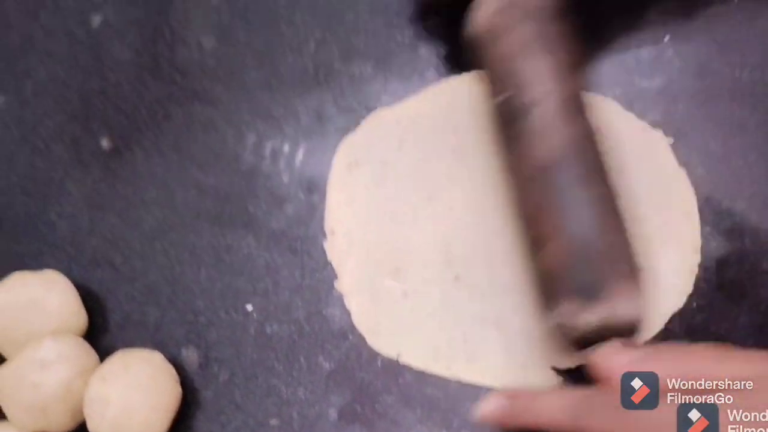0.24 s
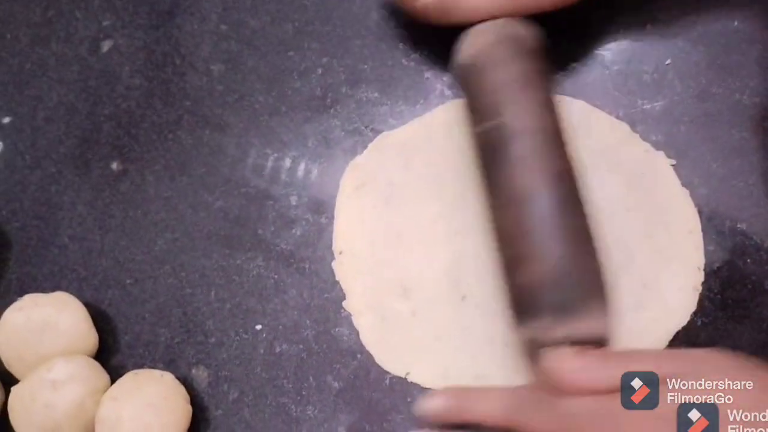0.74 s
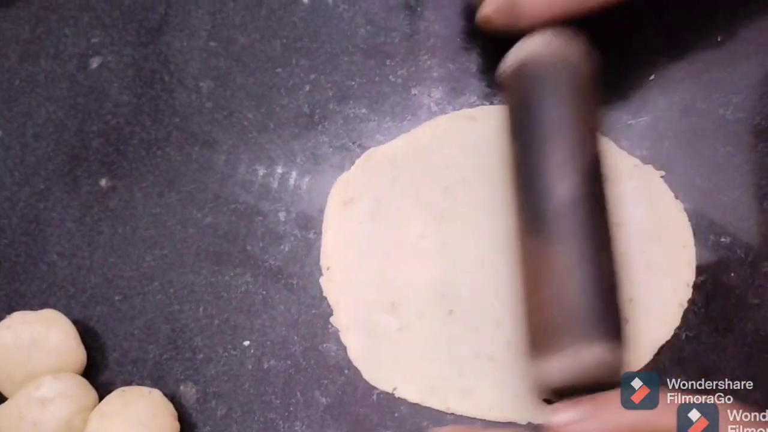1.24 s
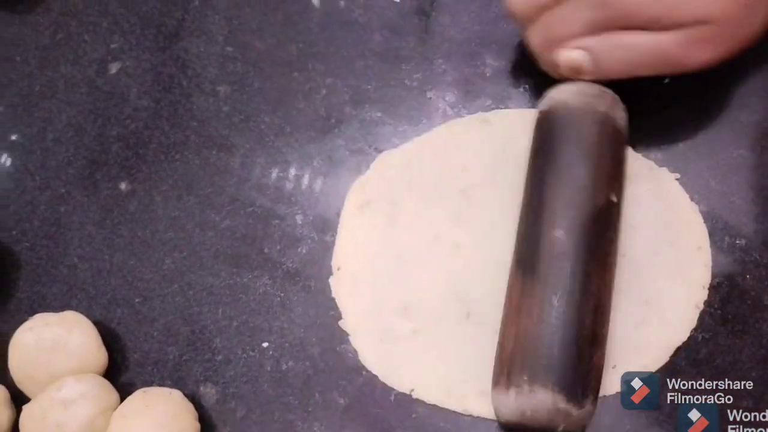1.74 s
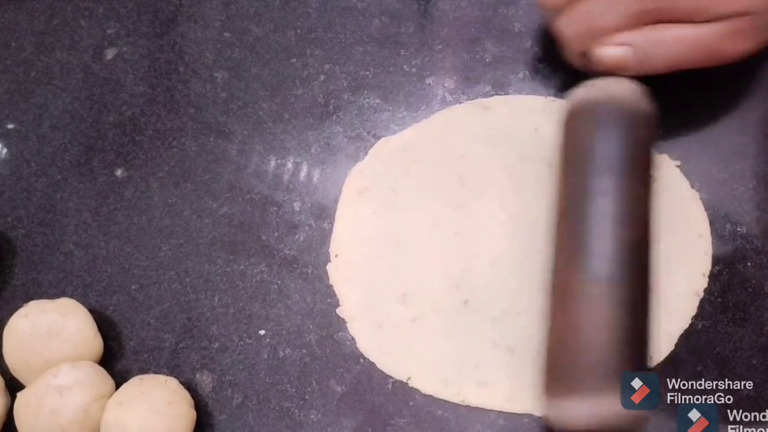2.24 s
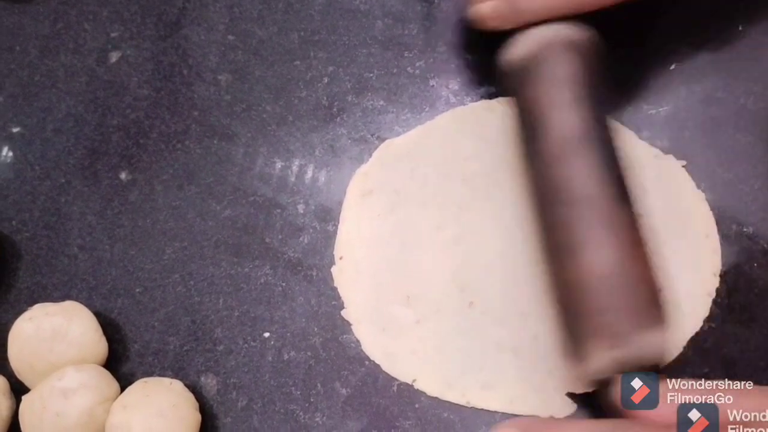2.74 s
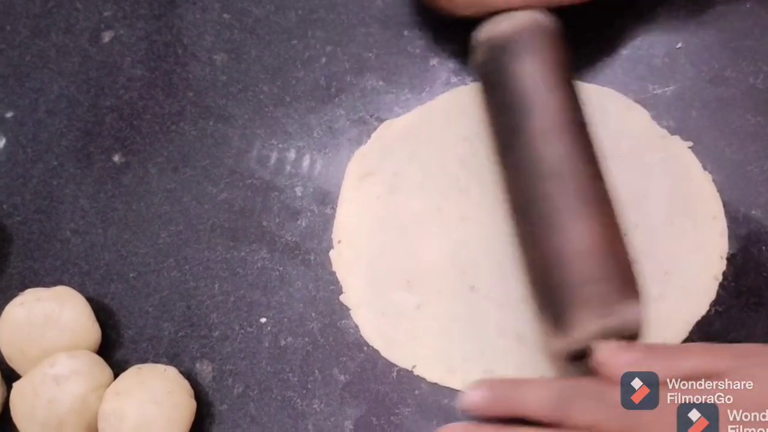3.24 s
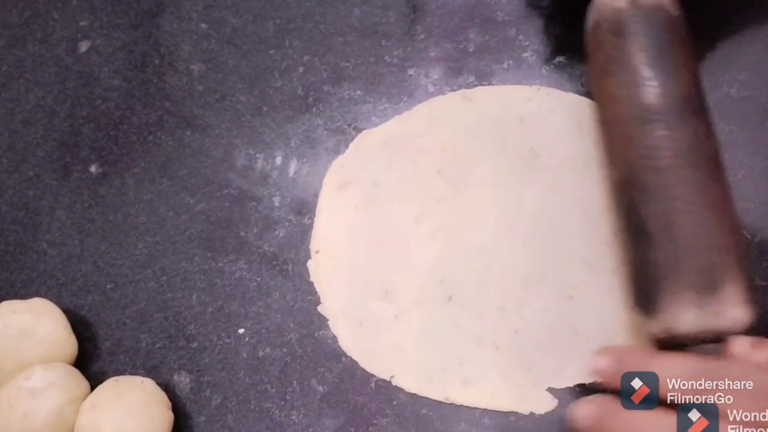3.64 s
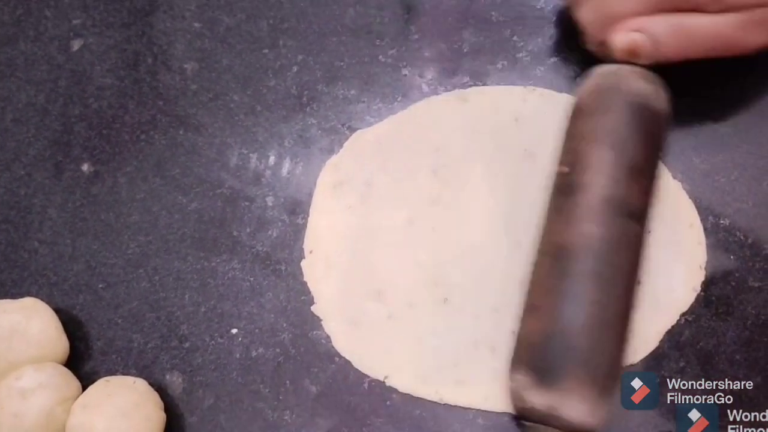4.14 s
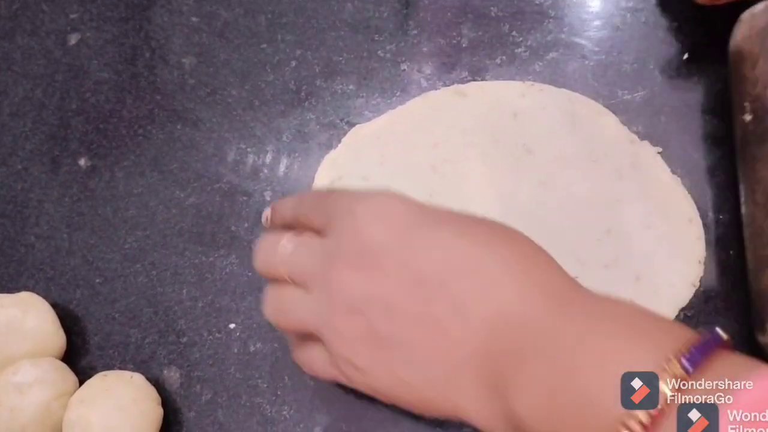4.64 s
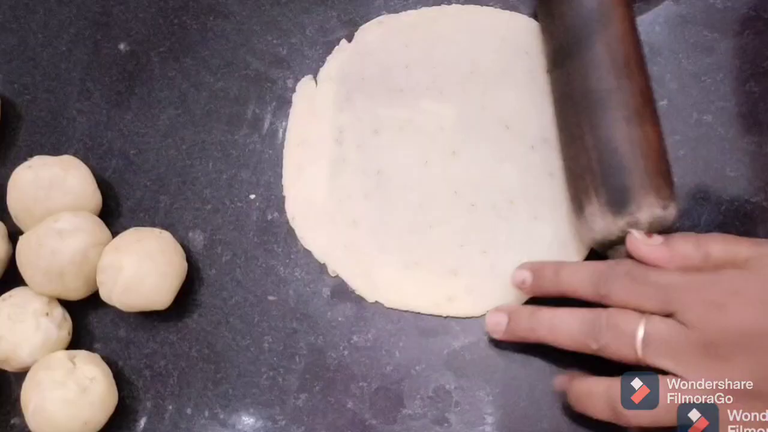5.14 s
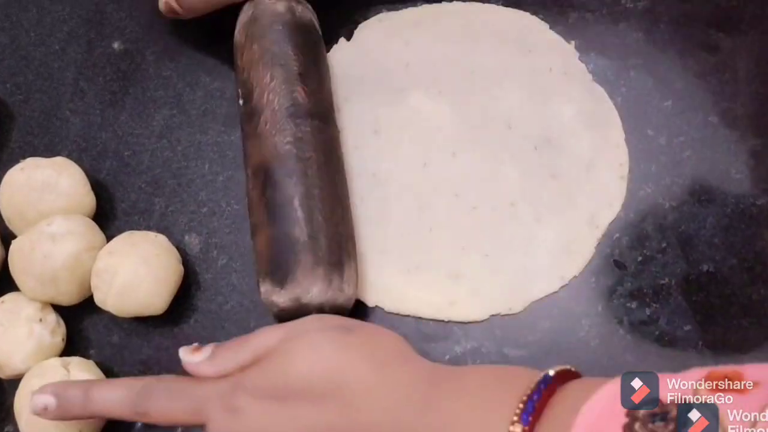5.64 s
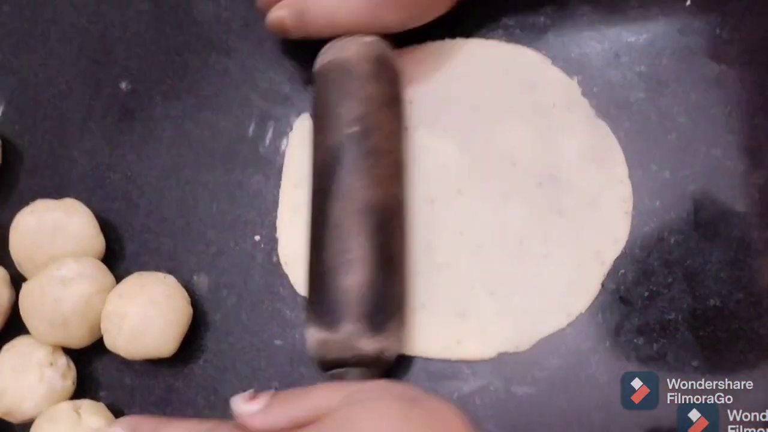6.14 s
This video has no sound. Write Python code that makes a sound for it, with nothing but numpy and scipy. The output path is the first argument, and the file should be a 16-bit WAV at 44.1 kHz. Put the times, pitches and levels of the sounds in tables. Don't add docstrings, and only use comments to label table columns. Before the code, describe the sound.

A wooden rolling pin knocks sharply on a stone counter at uneven intervals, with faint glass bangle ticks over a low wavering motor hum.

```python
import sys
import numpy as np
from scipy import signal
from scipy.io import wavfile
from scipy.ndimage import uniform_filter1d

SR = 44100
rng = np.random.default_rng(int(sys.argv[2]) if len(sys.argv) > 2 else 0)


def to_linear_factor(level_db):
    exponent = np.asarray(level_db, float) / 20
    return 10 ** exponent


def inscribe(sig):
    pcm = np.round(np.clip(np.atleast_2d(sig).T, -1, 1) * 32767)
    wavfile.write(sys.argv[1], SR, pcm.astype(np.int16))


N = 281358

# (frequency [Hz], density [dB per Hz])
AIR = [(15, -71.5), (25, -47.5), (53, -49.5), (80, -16.5), (114, -26.5), (146, -5.5), (171, -22.5),
       (196, -8.5), (287, -10), (494, -16.5), (742, -15.5), (1540, -21.5), (5520, -40), (14700, -43.5),
       (16300, -77)]
# (frequency [Hz], correlation [-1..1])
PORT_LIKENESS = [(60, 0.95), (150, 0.92), (380, 0.89), (950, 0.16), (2380, -0.039), (5980, -0.11),
                 (15000, 0.16)]
# (frequency [Hz], left minus right [dB])
PORT_BALANCE = [(60, -2.5), (130, -5), (290, 3), (640, -2.5), (1410, 0), (3100, -3), (6820, -10),
                (15000, 1)]
# (time [s], level [dB])
HUM_SWELLS = [(0, -51.5), (.7, -48), (1.15, -47.5), (1.3, -61), (1.62, -41), (2.0, -48), (2.158, -45.5),
              (2.64, -50.5), (3.1, -46.5), (3.8, -53.5), (4.1, -50.5), (4.32, -43), (4.801, -49),
              (4.96, -63), (5.1, -54), (5.85, -49.5), (6.0, -69), (6.38, -44.5)]
# (frequency [Hz], width [Hz], level [dB])
DRONE = (87, 9, -55)
# (time [s], peak [dB], crack centre [Hz], ring [dB], burst [ms])
TICKS = [(0.058, -45.5, 7100, -27, 2.1), (.18, -52, 8800, -28, 1.9), (.621, -42.5, 6700, -22, 4),
         (0.994, -50, 6800, -27.5, 2.9), (1.0375, -28, 7600, -19.5, 1.8), (2.573, -40.5, 7100, -26.5, 2.3),
         (2.671, -57, 7500, -27, 4), (3.08, -47, 6660, -28, 2.8), (3.1026, -30.5, 8600, -23, 2.2),
         (3.508, -48, 7500, -15.5, 2.5), (3.570, -40, 8100, -33, 3.2), (4.2023, -49, 7000, -26.5, 2.5)]
# (frequency [Hz], width [Hz], level [dB], t60 [s])
GLASS_MODES = [(7580, 420, -6.5, 0.5), (7100, 1700, -11.5, 0.41), (8500, 1500, -3.5, 0.12),
               (14000, 2000, -9.5, .15)]
# (frequency [Hz], t60 [s])
ROOM_DECAY = [(70, 0.4), (180, 0.69), (490, 0.54), (1290, 0.66), (2500, 0.97), (4000, 0.29), (8000, .45),
              (15000, 0.17)]
# (frequency [Hz], level [dB])
WALL_COLOUR = [(60, -4), (120, 6), (200, -4), (300, -1), (500, 6), (800, 9), (1200, 3.5), (1700, 1.5),
               (3000, 0), (6000, -3), (15000, -2.5)]
# (frequency [Hz], t60 [s], level [dB])
STANDING_WAVES = [(87.1, 0.94, -21), (110.4, 1.2, -26.5), (139.1, 0.72, -20.5), (168.5, 0.39, -28),
                  (214.8, 0.74, -22.5), (253, 0.61, -28.5), (312.7, 0.58, -22.5), (393, .5, -20),
                  (807, .6, -31.5)]
# (time [s], peak [dB], contact [ms], rebound delay [ms], rebound [dB])
KNOCKS = [(0.3831, -15.5, 0.56, 4.0, -6), (.410, -27, 0.58, 2.5, 3.5), (0.466, -30, 0.48, 4.1, 14),
          (1.3603, -2.6, 0.036, 3.5, -25), (2.8933, -8, 0.19, 3.0, -9.5), (3.8636, -4, 0.067, 2.5, -17),
          (4.69, -33, 0.33, 2.2, -3), (4.7180, -18.5, 0.087, 2.85, -4), (4.7653, -21, 0.081, 2.8, -4),
          (4.7927, -28, 0.063, 2.36, 5), (4.819, -28, 0.28, 2.06, -2), (5.115, -41, 0.19, 3.2, -6),
          (5.221, -35.5, 1.54, 8.4, 2)]
# (frequency [Hz], left [dB], right [dB])
PIN_MODES = [(254.3, -2, -3.5), (532, -3, -7), (812, -3, -4), (1150, -5, -1.5), (1475, -7.5, -6),
             (1748, -17, -16.5), (2030, -26, -11.5), (2300, -25, -13), (2900, -31, -18.5)]
# (frequency [Hz], gain [dB])
MIC = [(20, 1), (4200, 1), (5700, -4), (7500, 0), (9500, -2.5), (14500, -5), (15450, 4.5), (15900, -21.5),
       (22050, -48.5)]

AIR_DB, AIR_TREBLE_DB, AFTER_CUT_DB, RUSH_DB, RUSH_S = -43, -7, 0.77, 2, 0.071
CUT_S, BACK_S, FADE_S = 5.2695, 5.611, 0.055
HUM_HZ, WAVER_HZ = 144.6, 0.64
USUAL_TICK_DB, TOP_DB, TOP_PER_DB, LEFT_DB, LEFT_PER_DB = -42, -24, 0.8, -28, -2.3
BOUNCE_MS, BOUNCE_DB = 4.6, -5.5
CRACK_DB, CRACK_PER_DB, DOUGH_CRACK_DB_PER_MS, KNOCK_ROOM_DB = -40, 1.9, 15, -8.5
RISE_MS, LAG_MS = 0.9, 0.2
RING_S, GRIP_MS, SWELL, SWELL_MS = 0.09, 6.6, 0.6, 1.4
LIGHT_DB, LIGHT_GRIP = -17.5, 0.5


def read(points, hz):
    f, value = np.transpose(points)
    return np.interp(np.log(hz + 1), np.log(f + 1), value)


def evened(x):
    return x / np.sqrt(np.mean(x ** 2) + 1e-20)


def add(mix, s, sound):
    part = mix[..., round(s * SR):][..., :sound.shape[-1]]
    part += sound[..., :part.shape[-1]]


def band(x, order, hz, kind):
    return signal.sosfilt(signal.butter(order, hz, kind, fs=SR, output="sos"), x)


def resonate(x, hz, width):
    turn = np.exp(2j * np.pi * hz * np.arange(len(x)) / SR)
    r = np.exp(-np.pi * width / SR)
    return 2 * (turn * signal.lfilter([1 - r], [1, -r], x / turn)).real


def diffuse(frames, db, size):
    hz = np.fft.rfftfreq(size, 1 / SR)[:, None]
    t = np.arange(frames) * size / 4 / SR
    a, b, c, d = rng.standard_normal((frames, len(hz), 4)).T
    same = np.clip(read(PORT_LIKENESS, hz), -1, 1)
    left = a + 1j * b
    right = same * left + np.sqrt(1 - same ** 2) * (c + 1j * d)
    lean = to_linear_factor(read(PORT_BALANCE, hz) / 2)
    spectrum = np.array([left * lean, right / lean]) * to_linear_factor(db(hz, t))
    return signal.istft(spectrum, nperseg=size, noverlap=size * 3 // 4)[1]


def air():
    frames = N // 512 + 5
    patches = rng.standard_normal((frames, 1025)).T
    patches = uniform_filter1d(patches, 20, axis=0)
    patches = evened(uniform_filter1d(patches, 6, axis=1))

    def rush(t):
        return (t > CUT_S) * RUSH_DB * np.exp(-np.maximum(t - BACK_S, 0) / RUSH_S)

    def level(hz, t):
        treble = np.clip(np.log2(hz / 2500 + 1e-9), 0, 1)
        return read(AIR, hz) + 0.74 * patches + treble * (AIR_TREBLE_DB - rush(t))

    noise = diffuse(frames, level, size=2048)
    t = np.arange(N) / SR
    return to_linear_factor(AIR_DB + (t > CUT_S) * AFTER_CUT_DB + rush(t)) * evened(noise[:, :N])


def hum():
    s, db = np.transpose(HUM_SWELLS)
    t = np.arange(N) / SR
    rates = np.geomspace(0.3, 5, num=12)
    drift = evened(sum(np.sin(2 * np.pi * (f * t + rng.random())) / np.sqrt(f) for f in rates))
    phase = 2 * np.pi * np.cumsum(HUM_HZ + WAVER_HZ * drift) / SR
    tone = np.sqrt(2) * to_linear_factor(np.interp(t, s, db)) * np.sin(phase)
    drone_hz, width_hz, drone_db = DRONE
    drone = to_linear_factor(drone_db) * evened(resonate(rng.standard_normal(N), drone_hz, width_hz))
    return (tone + drone) * to_linear_factor([[-0.6], [0.6]])


def tick(peak_db, crack_hz, top_db, ring_db, burst_ms):
    t = np.arange(12000) / SR
    noise = rng.standard_normal((2, len(t)))
    after = t - np.array([[0], [BOUNCE_MS / 1000]])
    touches = to_linear_factor([[0], [BOUNCE_DB]]) * (after >= 0) * np.exp(-abs(after) / (burst_ms / 1000 + 1e-4))
    grit = noise[0] * touches.sum(0)
    wide = band(grit, 3, [4200, 10500], "band")
    top = band(grit, 3, 10000, "high")
    crack = wide + to_linear_factor(top_db + 8.5) * top + 0.83 * resonate(grit, crack_hz, 900)
    ring = 0
    for hz, width, db, t60 in GLASS_MODES:
        cluster = resonate(resonate(noise[1], hz, width), hz, width)
        ring = ring + to_linear_factor(db - 60 * t / t60) * evened(cluster)
    ring = ring * (1 - np.exp(-t / 0.0031))
    return to_linear_factor(peak_db) * (crack / abs(crack).max() + to_linear_factor(ring_db) * ring)


def kitchen(x):
    tail = diffuse(300, lambda hz, t: read(WALL_COLOUR, hz) - 60 * t / read(ROOM_DECAY, hz), size=512)
    t = np.arange(tail.shape[1]) / SR
    tail = tail / np.linalg.norm(tail[0]) * np.clip((t - 0.006) / 0.0011, 0, 1)
    for hz, t60, db in STANDING_WAVES:
        build = np.clip(t / 0.011, 0, 1)
        tail = tail + to_linear_factor(db - 26 - 60 * t / t60) * np.sin(2 * np.pi * hz * t) * build
    return signal.fftconvolve(x[None], tail, axes=1)[:, :N]


def knock(peak_db, crack_db, contact_ms, rebound_ms, rebound_db):
    t = np.arange(3000) / SR
    contact = np.clip(contact_ms, 0.03, 2) / 1000
    after = np.maximum(t[:900] - np.array([[0], [rebound_ms / 1000]]), 0)
    blows = to_linear_factor([[0], [rebound_db]]) * after ** 2 * np.exp(-after / contact)

    late = np.maximum(t - np.array([[LAG_MS + RISE_MS], [RISE_MS]]) / 1000, 0)
    ring = 0
    for hz, left, right in PIN_MODES:
        fall_db = 60 * late / RING_S * (hz / 600) ** 0.8
        ring = ring - to_linear_factor([[left], [right]] - fall_db) * np.cos(2 * np.pi * hz * (late - 0.0005))
    ring = ring * np.minimum(late / 0.0005, 1)
    grip_ms = GRIP_MS * (LIGHT_GRIP if peak_db < LIGHT_DB else 1)
    swell = 1 - SWELL * np.exp(-1000 * late / SWELL_MS)
    held = ring * swell / (1 + (1000 * late / grip_ms) ** 4)

    body = band(signal.oaconvolve(held, blows.sum(0)[None], axes=1)[:, :len(t)], 2, 80, "high")
    thud = band(signal.oaconvolve(ring.mean(0) * np.exp(-t / 0.003), blows[0])[:len(t)], 2, 80, "high")
    thud = thud * np.linalg.norm(body[1]) / np.linalg.norm(thud)

    grit = band(rng.standard_normal((2, len(t))), 1, [3000, 9000], "band")
    fall = to_linear_factor(crack_db + 1.0 - 60 * late / 0.03) + to_linear_factor(crack_db - 10.5 - 60 * late / 0.35)
    grit = fall * grit * to_linear_factor([[-3], [5]]) * (1 - np.exp(-late / 0.00065))
    gain = to_linear_factor(min(peak_db, -0.3)) / abs(body).max()
    return gain * body + grit, gain * thud + grit[1]


def scene():
    near, send = np.zeros((2, N)), np.zeros(N)
    for s, peak_db, crack_hz, ring_db, burst_ms in TICKS:
        louder_db = peak_db - USUAL_TICK_DB
        sound = tick(peak_db + 2.5, crack_hz, TOP_DB + TOP_PER_DB * louder_db, ring_db, burst_ms)
        add(near, s, sound * to_linear_factor([[LEFT_DB + LEFT_PER_DB * louder_db], [0]]))
        add(send, s, to_linear_factor(-11.0) * sound)
    for s, peak_db, contact_ms, *rebound in KNOCKS:
        crack_db = CRACK_DB + CRACK_PER_DB * peak_db + DOUGH_CRACK_DB_PER_MS * contact_ms
        sound, thud = knock(peak_db, crack_db, contact_ms, *rebound)
        add(near, s, sound)
        add(send, s, to_linear_factor(KNOCK_ROOM_DB) * thud)
    return near + kitchen(send) + air() + hum()


def roll_off(x):
    return signal.sosfilt(signal.butter(12, 16480, fs=SR, output="sos"), x)


def record(dry):
    hz = np.linspace(0, SR / 2, 257)
    response = signal.firwin2(255, hz, to_linear_factor(read(MIC, hz)), fs=SR)
    heard = signal.oaconvolve(dry, response[None], "same")
    t = np.arange(N) / SR
    stop = np.clip((CUT_S - t) / 0.0005, 0, 1)
    back = (t > BACK_S) * np.clip(0.11 + (t - BACK_S) / FADE_S, 0, 1)
    return roll_off(heard * (stop + back))


dry = scene()
out = record(dry)
inscribe(out)
```